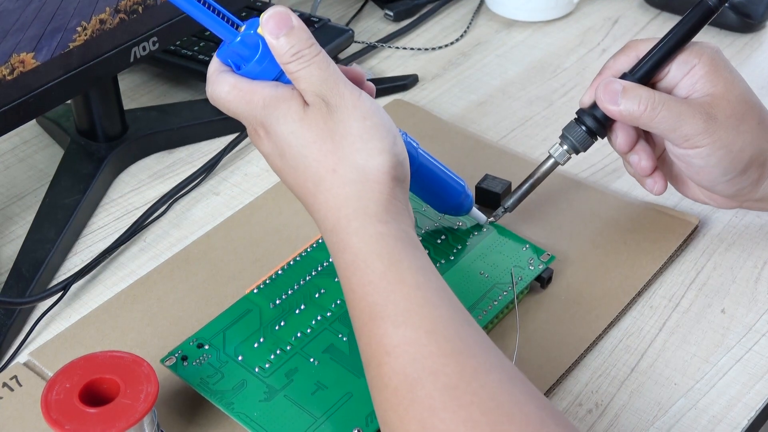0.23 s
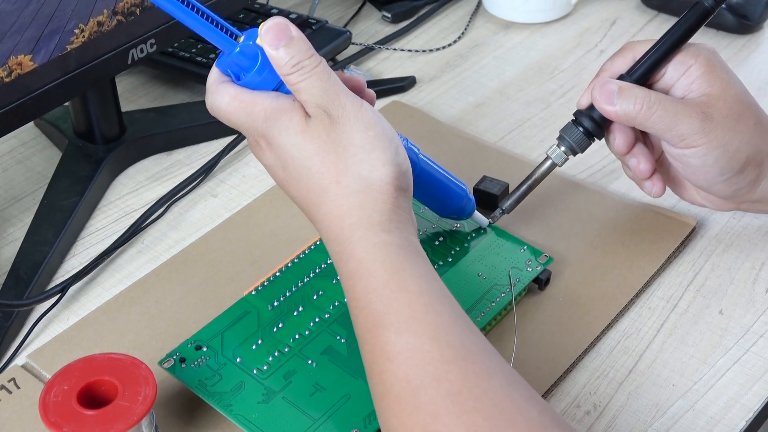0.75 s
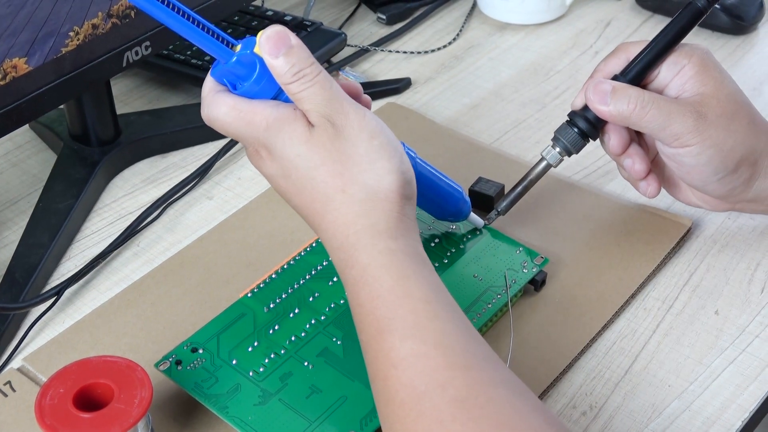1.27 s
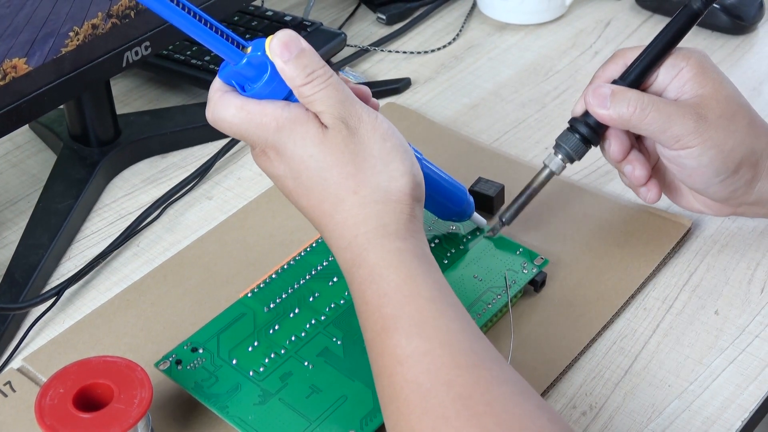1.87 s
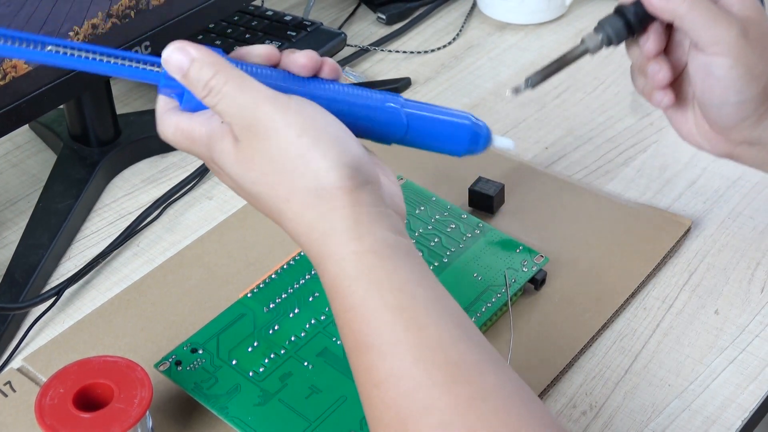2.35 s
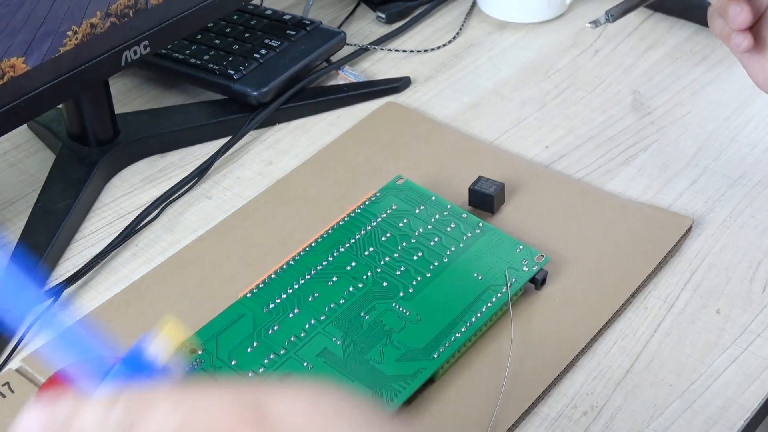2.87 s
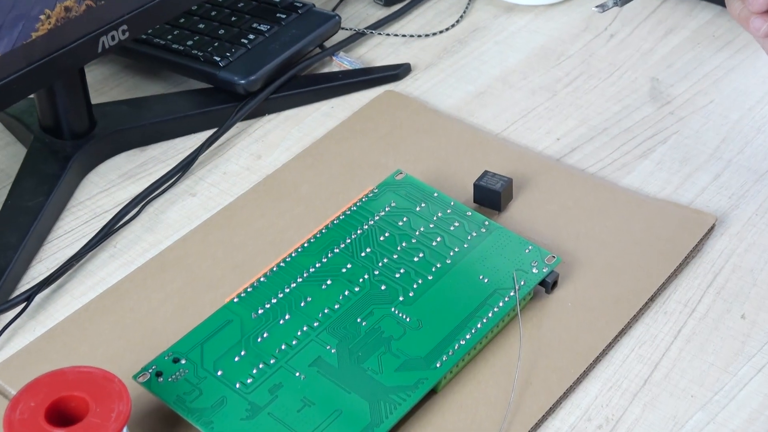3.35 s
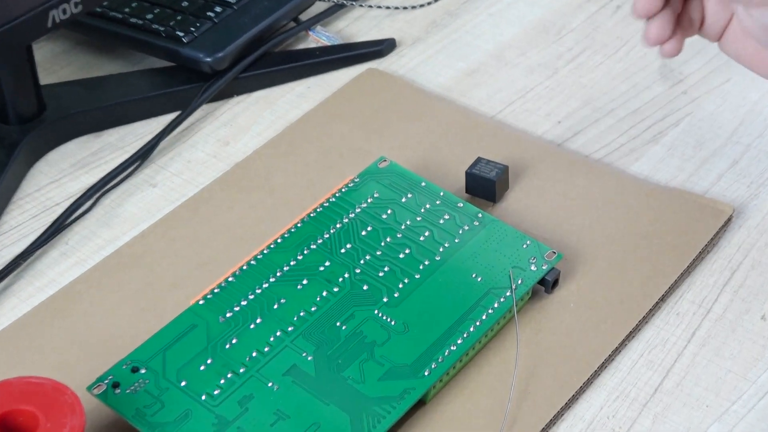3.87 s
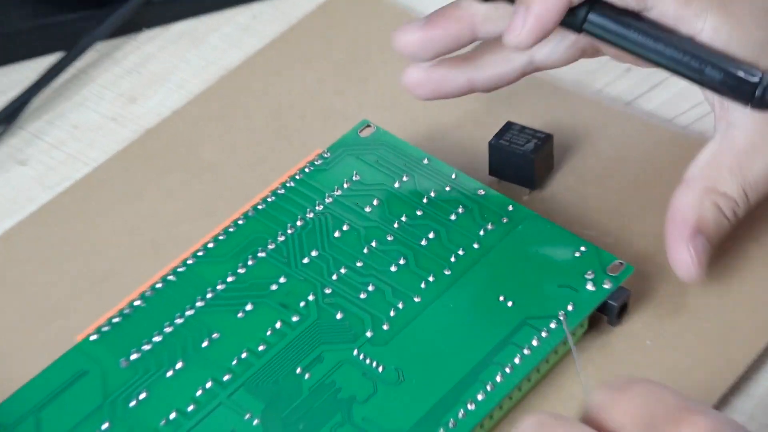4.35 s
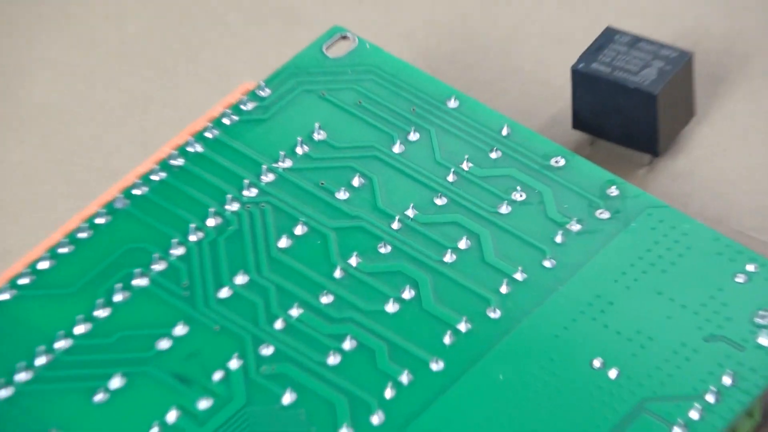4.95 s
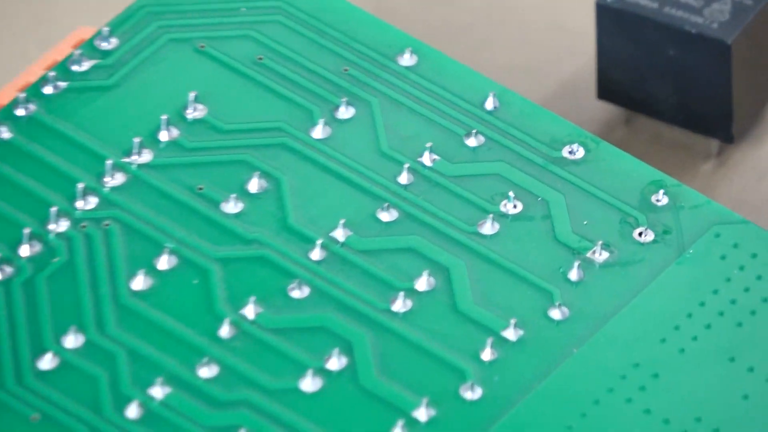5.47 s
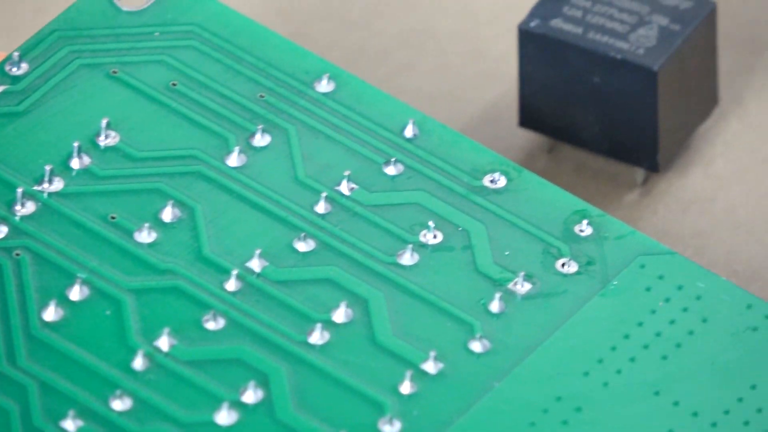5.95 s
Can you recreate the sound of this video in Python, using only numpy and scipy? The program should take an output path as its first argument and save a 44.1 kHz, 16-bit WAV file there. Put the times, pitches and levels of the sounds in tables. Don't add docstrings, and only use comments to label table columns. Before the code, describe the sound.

A low fan rumble and drone, swelling in gusts, runs throughout with soft air rush, thin hiss and faint steady hum, in a small room picked up by a small camera microphone. At 0.25-0.5 s a sleeve drags dully on the bench. At 1.67 s a light plastic latch clicks; at 1.88-1.91 s the pump's plunger slams in a hard, bouncing crack, by far the loudest event, slightly overloaded, with a brief room tail. Faint rubs and ticks near 3 s. At 3.65 s the pump clatters onto the bench, and at 3.86 s the iron lands heavier and duller, with a late tap at 3.97. Close clicks and scuffs start around 4.3; a bright zoom motor whine rises and falls from 4.5 to 4.86. More scuffs and ticks around 5.4-5.7, a deep microphone bump at 5.80, then at 5.88 a metal stand is knocked, rattling and ringing, deadened at 5.96; soft sleeve drag ends near 6.2.

```python
import sys
import numpy as np
from scipy import signal
from scipy.fft import rfft, irfft
from scipy.io import wavfile
from scipy.ndimage import uniform_filter1d

SR = 44100
rng = np.random.default_rng(int(sys.argv[2]) if len(sys.argv) > 2 else 0)


def convert_level_to_amplitude(level_db):
    exponent = np.asarray(level_db, float) / 20
    return 10 ** exponent


def bounce(signal):
    frames = np.transpose(np.atleast_2d(signal))
    limited = np.clip(frames, -1, 1)
    pcm = np.round(limited * 32767).astype(np.int16)
    wavfile.write(sys.argv[1], SR, pcm)


N = 274346
T = np.arange(N) / SR

# (frequency [Hz], level [dB], t60 [s])
BARREL_MODES = [(3558, -30.5, 0.01), (3854, -15.5, 0.024), (6226, -14, 0.018), (7050, -17, .02),
                (9100, -15.5, 0.011)]
# (frequency [Hz], level [dB], t60 [s])
BENCH_MODES = [(436, -12, 0.3), (592, -7, 0.17), (716, -1, 0.15), (725, -13, 0.15), (910, -25, 0.056),
               (1125, -6, 0.2), (1310, -2.5, 0.15), (1420, -2.5, 0.23), (1630, -9, 0.14), (1920, -11, 0.14),
               (2120, -33, 0.085)]
# (frequency [Hz], gain [dB])
STAND_COLOUR = [(300, -28), (520, -5), (900, 7), (1500, 16.5), (3000, 9.5), (5000, -14), (9000, -7.5),
                (16000, -23)]
# (frequency [Hz], gain [dB])
SLEEVE_COLOUR = [(90, -31), (200, 14), (500, 3.5), (800, -9), (3000, -38)]


def pump_latch():
    # (time [s], peak [dB], rattle decay [ms], treble [dB])
    hits = [
        (1.6652, -15.5, 6, 2),
        (1.6664, -20, 1.4, 14),
        (1.6677, -10, 1.2, 8),
        (1.6722, -15, 1.8, 4.5),
        (1.683, -28, 5.3, -2.5),
    ]
    # (frequency [Hz], gain [dB])
    body = [(180, -26.5), (300, 6), (519, -11.5), (828, 11), (946, -7.5), (1810, -11.5), (3640, -4.5),
            (4910, -6.5), (6410, -5), (13100, -8.5), (16000, -18)]
    return strike(hits, body, BARREL_MODES[2:], body_db=0.15, ring_db=-12.5)


def pump_slam():
    # (time [s], peak [dB], rattle decay [ms], treble [dB])
    hits = [(1.8808, -22, 5, 4), (1.8870, -2, 5.8, 0.5), (1.8895, 2.5, 2.5, -4), (1.894, -2.5, 2.7, 1.5),
            (1.9005, 4, 1.9, 0.5), (1.903, 2.5, 3.3, -0.5), (1.9064, 4, 2.2, 3.5), (1.910, -12, 12, 4),
            (1.919, -13, 4, 3), (1.93, -17, 25, 1.5), (2.075, -22, 2.7, -2)]
    # (frequency [Hz], gain [dB])
    body = [(88, -23), (150, -3), (589, 0), (716, -3), (1260, -5), (1660, -2.5), (2810, -8.5), (3620, 0),
            (5790, -13.5), (6640, 4), (7320, -7), (15100, -8.5), (16000, -28.5)]
    return strike(hits, body, BARREL_MODES, body_db=0.1096, ring_db=-9.5)


def pump_down():
    # (time [s], peak [dB], rattle decay [ms], treble [dB])
    hits = [
        (3.6522, -10.5, 4.2, -3),
        (3.6552, -13.5, 3.4, 8.5),
        (3.661, -15, 8.8, 4),
        (3.689, -15, 2.7, -3),
        (3.700, -32.5, 42, -20),
    ]
    # (frequency [Hz], gain [dB])
    body = [(120, -40), (200, -8), (328, -6), (883, 7.5), (1180, 0.5), (2090, 3), (2910, -18),
            (6050, -13.5), (6760, -10.5), (14100, -20.5), (16000, -27)]
    return strike(hits, body, BENCH_MODES, body_db=4.3, ring_db=-20.0)


def iron_down():
    # (time [s], peak [dB], rattle decay [ms], treble [dB])
    hits = [
        (3.8565, -10.5, 7.3, 4.5),
        (3.863, -14.5, 5.5, -7),
        (3.8685, -10.5, 5.4, 0),
        (3.880, -12, 11.3, -7.5),
        (3.9658, -24, 1.8, 6),
        (3.968, -23, 16, -7),
        (4.07, -42, 3.6, 11),
    ]
    # (frequency [Hz], gain [dB])
    body = [(120, -3), (200, 1.5), (340, -9), (409, 9.5), (491, 4), (696, 3.5), (836, 3.5), (1210, -0.5),
            (2420, -8.5), (3800, -13), (5000, -20), (8420, -23.5), (16000, -37)]
    return strike(hits, body, BENCH_MODES, body_db=5.5, ring_db=-19.0)


def stand_base():
    # (time [s], peak [dB], rattle decay [ms], treble [dB])
    hits = [(5.8785, -13.5, 2.9, 0.5), (5.8815, -28, 9.8, 7), (5.883, -36, 40, 16), (5.899, -24, 6, -6),
            (5.908, -26, 6, -7), (5.938, -26.5, 10, -19), (5.962, -36, 5, -6), (5.985, -40, 47, -7),
            (6.07, -42, 5.1, -5), (6.148, -42.5, 7.1, -12), (6.185, -51, 7.3, -19)]
    # (frequency [Hz], level [dB], t60 [s])
    modes = [(474, -9, .15), (522, 2, .17), (575, -3, .18), (840, -9, .2), (877, -3, .2), (951, -12, .14),
             (1090, -17, .1)]
    return strike(hits, STAND_COLOUR, modes, body_db=-6, ring_db=-3)


def stand_frame():
    # (time [s], peak [dB], rattle decay [ms], treble [dB])
    hits = [
        (5.878, -39, 1.8, -6),
        (5.8812, -15.5, 1.4, -0.5),
        (5.887, -21, 13, -2),
        (5.897, -24, 17, 1.5),
        (5.912, -26, 28, -3),
        (5.932, -28, 15, -1),
        (5.962, -33, 8, -36),
        (5.975, -23.5, 16, -16),
    ]
    # (frequency [Hz], level [dB], t60 [s])
    modes = [(1210, -12, .12), (1350, -13, .12), (1550, -5, .2), (1720, -13, .12), (1870, -9, .15),
             (2300, -18, .3), (2584, -19, .3), (2850, -23, .15), (2982, -21, .2), (3400, -25, .12),
             (3566, -20, .5), (2050, -14, .25), (2220, -13, .25), (2420, -14, .35), (2680, -14, .35),
             (3230, -13, .2), (3660, -13, .55), (3740, -17, .4), (4226, -24, .3), (4404, -12, .48),
             (4640, -24, .19), (5330, -28, .4), (5500, -30, .5), (6190, -29, .2), (6520, -29, .25),
             (6710, -30, .2), (7060, -26, .3), (7710, -25, .2), (8380, -25, .25), (9140, -25, .3),
             (9340, -24, .2), (10600, -33, .2), (11500, -32, .2), (12100, -33, .2), (12760, -33, .2),
             (13900, -34, .2)]
    lands_s, landing_s, damping_db = 5.962, .012, -5
    ringing = strike(hits, STAND_COLOUR, modes, body_db=-13, ring_db=-8)
    return ringing * convert_level_to_amplitude(damping_db * np.clip((T - lands_s) / landing_s, 0, 1))


def thuds():
    # (time [s], peak [dB], frequency [Hz], t60 [s])
    bench = [(1.668, -36, 52.7, 0.27), (1.8914, 1.5, 756, 0.0055), (1.895, -21.5, 56, 1.1),
             (1.894, -11, 93.5, .097), (1.906, -12.5, 425, 0.034), (3.6512, -4, 1050, 0.008),
             (3.6515, -13, 1700, .012), (3.653, -19, 2000, .015), (3.653, -19.5, 790, 0.044),
             (3.651, -30, 1800, 0.021), (3.693, -21.5, 436, 0.16), (3.694, -28, 500, 0.071),
             (3.704, -29, 480, .05), (3.7215, -28, 530, .05), (3.733, -26, 445, 0.099),
             (3.755, -29.5, 426, .06), (3.675, -28, 2080, .05), (3.6885, -22, 1340, .012),
             (3.6605, -18, 830, .02), (3.8685, -24, 4100, .015), (3.868, -16, 700, .03),
             (3.908, -32, 2800, .02), (3.978, -31, 700, .04), (3.988, -23, 600, .03),
             (3.8565, -23, 4160, 0.022), (3.966, -21.5, 600, 0.05)]
    # (time [s], peak [dB], frequency [Hz], t60 [s])
    knocks = [(4.447, -36, 1210, 0.017), (4.470, -18, 946, .032), (4.489, -17, 1230, 0.011),
              (4.578, -30.5, 1155, 0.044), (4.835, -31.5, 4000, 0.012), (4.856, -44, 3750, .013),
              (5.35, -39, 565, .3), (5.42, -39.5, 2700, 0.18), (5.542, -30.5, 3660, 0.022)]
    # (time [s], peak [dB], frequency [Hz], t60 [s])
    bump = [
        (5.804, -4, 118, 0.016),
        (5.8054, -16.5, 1050, 0.0032),
    ]
    # (time [s], peak [dB], frequency [Hz], t60
    # [s])
    stand = [(5.879, -26, 3180, 0.043), (5.888, -28, 95, 0.47), (5.90, -26, 167, 0.29),
             (5.962, -14.5, 570, 0.067), (5.963, -15, 869, 0.11), (6.148, -31.5, 1050, 0.022),
             (5.975, -22, 877, 0.21), (5.99, -45, 3660, .35), (5.975, -37, 2293, .2),
             (6.01, -54.5, 5520, 0.33), (6.148, -42.5, 2640, 0.026)]
    # (time [s], peak [dB], frequency [Hz], t60 [s])
    dips = [
        (5.8031, -5.5, 460, 0.0029),
        (3.6517, -8, 980, 0.0051),
        (3.966, -15, 700, 0.0053),
    ]
    outward = sum(thud(*row) for row in bench + knocks + bump + stand)
    return outward - sum(thud(*row) for row in dips)


def zoom_motor():
    # (time [s], gear mesh [Hz])
    speed_points = [(4.485, 1120), (4.52, 1190), (4.60, 1450), (4.66, 1550), (4.71, 1550), (4.76, 1414),
                    (4.795, 1280), (4.82, 1200), (4.86, 980)]
    # (multiple of mesh [1], level [dB])
    gear_orders = [(4, -11), (5.5, -10), (8, -3), (9, -8), (10, -1), (11, -2), (12, -6), (13, -3),
                   (14, -10)]
    # (frequency [Hz], gain [dB])
    gear_case = [(8600, 0), (9200, -14), (11000, -12), (12000, 0), (16000, 0)]
    # (frequency [Hz], level [dB], t60 [s])
    lens_barrel = [(4450, -20, .014), (6100, -27, .008), (7100, -29, .010), (8300, -29, .010)]
    # (frequency [Hz], gain [dB])
    camera_colour = [(1470, -27), (2500, -13), (2940, 1), (3490, -1.5), (4440, -1.5), (4840, 8), (5390, -1),
                     (6200, 6.5), (7590, 0), (8400, 5), (10700, -3), (13300, 5), (16000, -8)]
    top_speed_db, db_per_octave = -15, 17
    start_ms, stop_ms, coasts_s = 6, 25, 4.81

    s, hz = np.transpose(speed_points)
    speed_hz = uniform_filter1d(np.interp(T, s, hz), SR // 50)
    push_hz_per_s = np.gradient(speed_hz) * SR
    speeding_up = np.clip(push_hz_per_s / 1300, .5, 2.2)
    braking = np.clip(-push_hz_per_s / 3000, .5, 1.2)
    load = np.maximum(speeding_up, braking)

    turns = np.cumsum(speed_hz * (1 + .001 * walk(40))) / SR
    teeth = sum(convert_level_to_amplitude(gain_db + 3.0 * walk(20)) * np.sin(2 * np.pi * k * turns) for k, gain_db in gear_orders)
    teeth = level(colour(teeth, gear_case), -5) * (T < s[-1])

    hiss = noise() * convert_level_to_amplitude(1.5 * walk(300))
    ring = sum(convert_level_to_amplitude(gain_db) * resonate(hiss, f, t60) for f, gain_db, t60 in lens_barrel)
    coast = convert_level_to_amplitude(slope(coasts_s, 0, np.inf, stop_ms))
    whine = .02 * colour(load * teeth + coast * (hiss + ring), camera_colour)

    on_db = slope(s[0] + 0.013, 0, start_ms, np.inf) - 200 * (T > s[-1] + .1)
    return whine * convert_level_to_amplitude(top_speed_db + db_per_octave * np.log2(speed_hz / hz.max()) + on_db)


def sleeve_drag():
    # (time [s], peak [dB], rattle decay [ms], treble [dB])
    rubs = [
        (.25, -30, 44, -20),
        (.30, -29.5, 60, -20),
        (.36, -37, 30, -20),
        (.44, -27, 15, -12),
    ]
    return strike(rubs, SLEEVE_COLOUR, [], body_db=0.1, ring_db=0)


def sleeve_return():
    # (time [s], peak [dB], rattle decay [ms], treble [dB])
    rubs = [
        (6.0, -34, 43, -15),
        (6.16, -26, 50, -19),
    ]
    return strike(rubs, SLEEVE_COLOUR, [], body_db=0, ring_db=0)


def scuffs():
    # (loudest at [s], level [dB], swell [ms per 10 dB], fade [ms per 10 dB], treble [dB])
    rubs = [
        (2.87, -62.5, 90, 81, 13.5),
        (3.2, -46.5, 30, 34, 7),
        (4.50, -39.5, 45, 125, 3.5),
        (4.9, -51, 420, 74, -8),
        (5.42, -40, 4.9, 54, 0),
        (5.56, -48.5, 140, 40, -18),
    ]
    # (frequency [Hz], gain [dB])
    body_colour = [(120, -28), (250, 4.5), (600, -0.5), (1300, 0), (2500, -6.5), (4000, -35)]
    # (frequency [Hz], gain [dB])
    rasp_colour = [(1000, -32), (2500, -4), (5000, -7), (8000, -15.5), (16000, -40)]
    grain = noise() * convert_level_to_amplitude(3.0 * walk(150))
    body = level(colour(grain, body_colour), 0)
    rasp = level(colour(grain, rasp_colour), 0)
    return sum(convert_level_to_amplitude(slope(*shape)) * (body + convert_level_to_amplitude(treble_db - 13.5) * rasp) for *shape, treble_db in rubs)


def ticks():
    # (time [s], peak [dB], ring [Hz], treble [dB])
    clicks = [(3.0919, -44.5, 5480, -19.5), (3.1854, -36, 3050, -17.5), (3.192, -35, 2590, -17),
              (3.212, -29, 6600, -21), (4.3095, -44, 4700, -25), (4.3095, -44, 11500, -10),
              (4.3312, -29, 7700, -9), (4.331, -32, 4300, -12), (4.4615, -40, 10800, -3),
              (4.461, -37, 5400, -2), (4.491, -19.5, 3200, -8.5), (4.6479, -31, 7030, -3),
              (4.6479, -30, 4000, -6), (4.7644, -38, 11500, -8), (4.805, -30, 4100, -22),
              (4.805, -31.5, 5900, -7), (4.8344, -31, 3980, -24), (4.856, -25, 3680, -10.5),
              (4.8654, -38, 3420, -8), (4.8972, -29.5, 6730, -8), (4.8975, -30, 11500, 4),
              (5.449, -26, 2720, -25.5), (5.4694, -41, 2750, -19), (5.5415, -23.5, 3380, -12),
              (5.7349, -34.5, 2630, -17.5), (6.098, -38, 7000, -25), (6.098, -42, 10200, -25)]
    decay_ms, wide = 2.23, 1.46
    out = 0
    for s, db, hz, treble_db in clicks:
        body = [(hz / wide ** 3, -30), (hz / wide, -10), (hz, 4), (hz * wide, -8), (hz * wide ** 2, treble_db)]
        out = out + place(s, colour(rattle(s, db, decay_ms), body))
    return out


def room(x, gap_s=.005):
    # (frequency [Hz], t60 [s])
    decay = [(150, 0.1834), (500, 0.36), (1500, 0.43), (4000, 0.41), (8000, 0.4), (14000, 0.281)]
    decay_hz, decay_s = np.transpose(decay)
    tail = 0
    for hz in 125 * 2 ** np.arange(0, 7.2, 1 / 3):
        sos = signal.butter(2, [hz / 1.14, hz * 1.14], "band", fs=SR, output="sos")
        t60 = np.interp(np.log(hz), np.log(decay_hz), decay_s)
        keep = convert_level_to_amplitude(-120 / (t60 * SR))
        stored = signal.lfilter([1 - keep], [1, -keep], signal.sosfilt(sos, x) ** 2)
        tail = tail + np.sqrt(stored) * level(signal.sosfilt(sos, noise()), 0)
    return place(gap_s, tail)


def fan():
    # (time [s], level [dB])
    load_points = [(0, 2), (.14, -9.5), (.43, 2), (.74, -3.5), (1.11, 2), (1.5, -3), (1.7, 7), (1.87, 2),
                   (2.03, 1.5), (2.6, -2), (2.79, 4), (2.94, -2.5), (3.84, -0.5), (4.6, 0), (4.73, 5),
                   (4.92, -2), (5.51, 1.5), (6.22, -1)]
    # (frequency [Hz], density [dB per Hz])
    rumble_colour = [(15, -41), (25, -7.5), (38, -2.5), (54, -4), (69, -5), (81, -21.5), (108, -10),
                     (140, -20), (180, -47), (310, -120)]
    drone_colour = [(82, -38.5), (140, -2), (172, -9), (205, -2), (232, -14), (284, -1.5), (320, -25.5),
                    (420, -54.5), (700, -120)]
    air_colour = [(180, -25), (300, 1), (312, -12), (350, -2), (371, -5.5), (389, -7.5), (458, -4.5),
                  (567, -9), (630, -6.5), (817, -10.5), (1160, -11.5), (1500, -18), (3000, -29),
                  (3900, -60), (6600, -120)]
    hiss_colour = [(1650, -28.5), (2800, -9), (3150, -2.5), (5560, -8), (13900, -10), (15100, -9.5),
                   (16000, -14)]
    # (frequency [Hz], level [dB])
    lines = [(47.5, -47.5), (56, -46.5), (285.3, -69.5), (360.7, -63.5), (651.4, -60.5), (2606, -84)]
    drone_share, air_share = 0.44, 0.17
    blade_hz, blade_t60_s, blade_mean_db = 204.6, 0.59, -54
    beat_db, beat_s, beat_top_s = 7, 4.3, 0.8
    whistle_hz, whistle_db = 14605, -77

    load_db = np.interp(T, *np.transpose(load_points))
    rumble = level(colour(noise(), rumble_colour), -41) * convert_level_to_amplitude(load_db + 3.0)
    drone = level(colour(noise(), drone_colour), -50.5) * convert_level_to_amplitude(drone_share * load_db + 1.1)
    air = level(colour(noise(), air_colour), -51) * convert_level_to_amplitude(air_share * load_db + 2.5 + 1.0 * walk(18))
    hiss = level(colour(noise(), hiss_colour), -63)
    blade_db = blade_mean_db + beat_db * np.cos(2 * np.pi * (T - beat_top_s) / beat_s)
    blade = level(resonate(noise(), blade_hz, blade_t60_s), .1) * convert_level_to_amplitude(blade_db + 1.5 * walk(3.995))
    hum = sum(level(resonate(noise(), hz, .7), db) for hz, db in lines)
    whistle = convert_level_to_amplitude(whistle_db + 2.5 * walk(3)) * np.sin(2 * np.pi * whistle_hz * T + 1.5 * walk(30))
    return rumble + drone + air + hiss + blade + hum + whistle


def strike(hits, body, modes, body_db, ring_db):
    start = min(hit[0] for hit in hits)
    force = sum(place(hit[0] - start, rattle(*hit), size=SR) for hit in hits)
    kick = signal.unit_impulse(256)
    kicks = sum(place(s - start, convert_level_to_amplitude(db) * soften(kick, 2 * treble_db), size=SR) for s, db, _, treble_db in hits)
    drive = kicks + 0.081 * force
    ring = sum((-1) ** k * convert_level_to_amplitude(db) * resonate(drive, hz, t60) for k, (hz, db, t60) in enumerate(modes))
    return place(start, convert_level_to_amplitude(body_db) * colour(force, body) + convert_level_to_amplitude(ring_db) * ring)


def rattle(s, db, decay_ms, treble_db=0):
    age_s = np.arange(SR // 8) / SR
    envelope = (1 - np.exp(-age_s / .0003)) * np.exp(-1000 * age_s / decay_ms)
    return soften(convert_level_to_amplitude(db) * envelope * rng.standard_normal(len(age_s)), treble_db)


def soften(x, treble_db):
    return colour(x, [(2200, 0), (3500, treble_db)])


def thud(s, db, hz, t60):
    push = np.hanning(int(min(SR / hz / 4, 40)) + 3)
    return place(s, convert_level_to_amplitude(db) * resonate(place(0, push / push.sum(), size=SR), hz, t60))


def resonate(x, hz, t60):
    pole = np.exp(2j * np.pi * hz / SR - np.log(1000) / (t60 * SR))
    return signal.lfilter([1], [1, -pole], x).imag


def colour(x, points):
    hz, db = np.transpose(points)
    size = 2 ** 13
    log_gain = np.interp(np.log(np.fft.rfftfreq(size, 1 / SR) + 1), np.log(hz), db) * np.log(10) / 20
    ceps = irfft(log_gain)
    ceps[1:size // 2] *= 2
    ceps[size // 2 + 1:] = 0
    impulse = irfft(np.exp(rfft(ceps)))[:size // 2]
    return signal.fftconvolve(x, impulse)[:len(x)]


def noise():
    return rng.standard_normal(N)


def level(x, db):
    return x * convert_level_to_amplitude(db) / np.sqrt(np.mean(x ** 2))


def walk(rate_hz):
    k = int(SR / rate_hz)
    return level(uniform_filter1d(uniform_filter1d(noise(), k), k), 0)


def slope(s, db, rise_ms, fall_ms):
    return db - 1e4 * np.maximum((s - T) / rise_ms, (T - s) / fall_ms).clip(0, .02)


def place(s, x, size=N):
    out, i = np.zeros(size + len(x)), int(s * SR)
    out[i:i + len(x)] = x
    return out[:size]


def scene():
    latch, slam = pump_latch(), pump_slam()
    pump, iron = pump_down(), iron_down()
    base, frame = stand_base(), stand_frame()
    near = ticks() + scuffs() + sleeve_drag()
    blows = latch + slam + pump + iron + base + frame
    wet = convert_level_to_amplitude(-6.5) * latch + convert_level_to_amplitude(-7.5) * slam + convert_level_to_amplitude(-8.5) * pump + convert_level_to_amplitude(-6.5) * iron
    wet = wet + convert_level_to_amplitude(-8) * base + convert_level_to_amplitude(-13) * frame + convert_level_to_amplitude(-8.5) * near
    mix = blows + room(wet) + near + thuds() + zoom_motor() + fan() + sleeve_return()
    return mix[None]


def band_limit(x):
    return signal.sosfilt(signal.butter(12, 16990, fs=SR, output="sos"), x)


def record(dry):
    bass_cut = signal.butter(6, 38, "high", fs=SR, output="sos")
    treble_cut = signal.ellip(8, .3, 50, 15850, fs=SR, output="sos")
    heard = signal.sosfilt(np.vstack([bass_cut, treble_cut]), dry)
    clipped = 1.485 * np.tanh(heard / 1.752)
    top_cut = signal.ellip(8, .3, 70, 16900, fs=SR, output="sos")
    return band_limit(signal.sosfilt(top_cut, clipped))


dry = scene()
out = record(dry)
bounce(out)
```